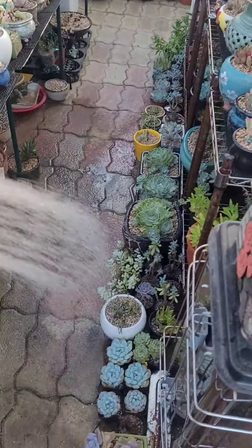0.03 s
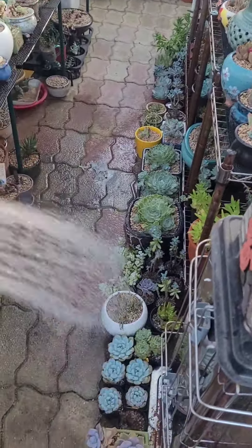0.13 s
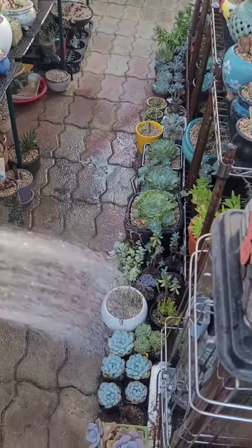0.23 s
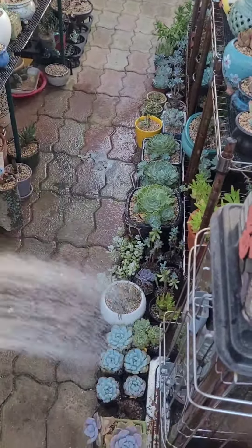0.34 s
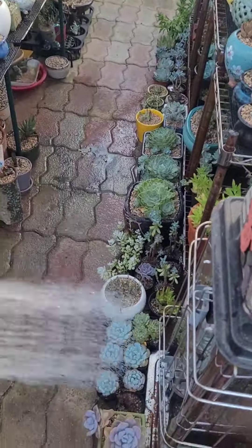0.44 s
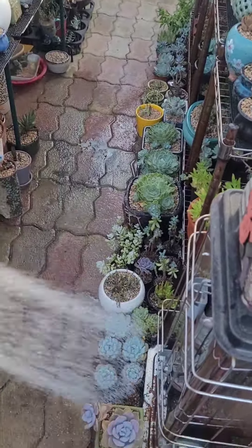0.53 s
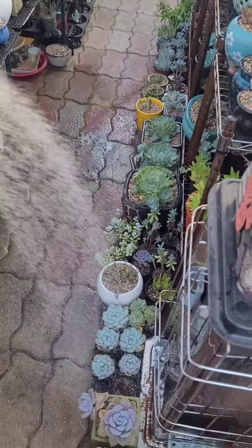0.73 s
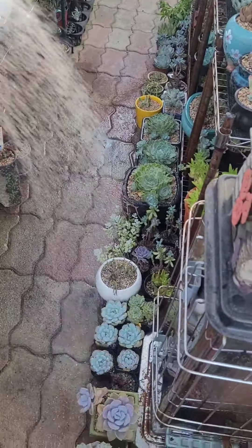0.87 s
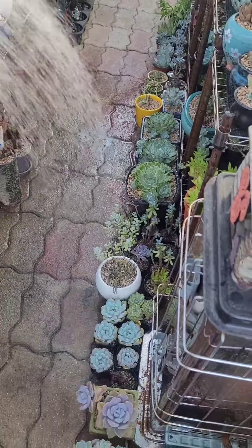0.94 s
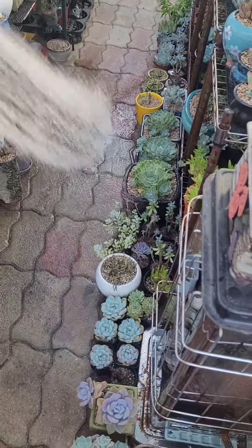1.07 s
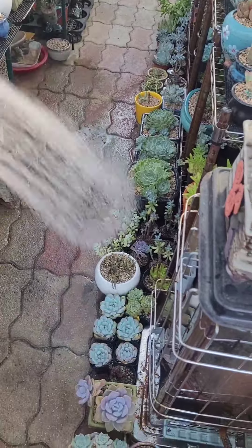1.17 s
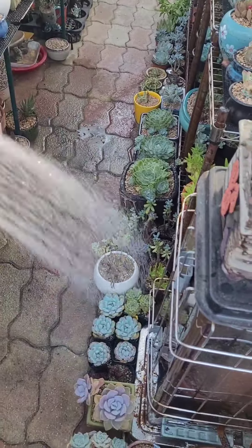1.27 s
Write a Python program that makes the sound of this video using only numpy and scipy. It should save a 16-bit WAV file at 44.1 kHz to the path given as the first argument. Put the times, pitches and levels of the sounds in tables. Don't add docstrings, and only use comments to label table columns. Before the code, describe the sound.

A hose nozzle sprays fine water in a continuous bright hiss, drops pattering on leaves and pots at first, then one deep soft thump from a hand on the microphone; close outdoor paved yard, hiss on the left.

```python
import sys
import numpy as np
from scipy import signal
from scipy.fft import rfft, irfft
from scipy.io import wavfile
from scipy.ndimage import uniform_filter1d

SR = 44100
rng = np.random.default_rng(int(sys.argv[2]) if len(sys.argv) > 2 else 0)


def nominal_scale(level):
    x = np.asarray(level, float) / 20
    return 10 ** x


def digitize_waveform(pressure):
    field = np.atleast_2d(pressure).T
    bounded = np.clip(field, -1, 1)
    quanta = np.round(bounded * 32767).astype(np.int16)
    wavfile.write(sys.argv[1], SR, quanta)


N = 57330
T = np.arange(N) / SR
BIN_HZ = np.arange(N // 2 + 1) * SR / N

# (time [s], level [dB])
JET_LEVEL = [(0.0, -37), (0.05, -38.5), (0.242, -38), (0.38, -41), (0.398, -38.5), (0.672, -40),
             (0.782, -42), (1.296, -41), (1.3, -43)]
# (frequency [Hz], density [dB per Hz])
JET_SPECTRUM = [(500, -33.5), (1000, -27.5), (2000, -12), (3000, -5), (8000, -7.5), (8350, -3.5),
                (12000, -1.5), (15800, -3)]
# (time [s], pose [0 near pots, 1 turning, 2 far pots])
SWING_POSE = [(0, 0.21), (.2, 0.41), (.34, 0.98), (.66, 1.04), (.76, 1.82), (1., 2.6), (1.3, 1.56)]
# (centre [Hz], width [Hz], gain near [dB], gain turning [dB], gain far [dB])
HAND_RESONANCES = [(1330, 430, 3, 1.5, -2.5), (2620, 210, -5, -0.3, 1), (3185, 325, 1.5, 4.5, 0.5),
                   (4070, 160, 4, -10, 4), (4930, 450, 2, -1.5, 0.5), (5860, 275, 2, 4, 3),
                   (7160, 330, -11, -8, 3.7), (6620, 150, 2.5, 0.7, -6), (8750, 440, -3, 4.5, 3),
                   (10170, 1090, 7, 2.3, 9.5), (11700, 350, 0.2, 0, -1.5), (13040, 360, -7, -4.5, 4),
                   (13700, 350, 4.5, 3, 6), (14800, 210, -10, -7, 7)]
# (time [s], level [dB])
LANDING_LEVEL = [(0, -55), (.07, -54.5), (.135, -56.5), (.17, -65.5), (.2, -64), (.215, -56), (.25, -63.5),
                 (.4, -74), (.5, -72), (.56, -70), (.95, -69.5), (1.02, -68), (1.08, -71), (1.3, -90)]
# (frequency [Hz], density [dB per Hz])
YARD_SPECTRUM = [(25, -32), (55, -6), (100, 1), (160, -11.5), (300, -2.5), (500, -10.5), (900, -26),
                 (2000, -42)]
# (time [s], level [dB])
GRIP_LEVEL = [(0, -31.5), (.08, -33.5), (.2, -32), (.3, -32), (.39, -30.5), (.5, -37.5), (.535, -42),
              (.57, -33), (.64, -31.5), (.69, -35.5), (.72, -42.5), (.76, -38.5), (1., -37.5), (1.1, -41),
              (1.155, -30), (1.195, -42.5), (1.23, -35), (1.3, -43)]
# (frequency [Hz], density [dB per Hz])
TREMOR_SPECTRUM = [(18, -41), (35, 1.5), (52, 5), (68, -0.5), (100, -17.5), (160, -29), (300, -47),
                   (600, -66)]
# (frequency [Hz], density [dB per Hz])
SELF_SPECTRUM = [(300, 18.5), (1000, -1), (3000, -1), (8000, -13), (11000, -9), (16000, -26)]
# (time [s], peak [dB], polarity [+1 or -1])
FINGER_SLIPS = [
    (0.057, -38, 1),
    (0.11, -63, 1),
    (0.197, -32.5, 1),
    (.234, -33, -1),
    (0.258, -32.5, 1),
    (.289, -34, -1),
    (0.408, -44, 1),
    (0.569, -45, 1),
    (0.701, -50, 1),
]
# (time [s], peak [dB], pitch [Hz], share of dull knock [ratio])
FAT_DROPS = [(0.091, -42, 1820, 0.39), (.125, -46, 1485, 0.32), (.2085, -32, 1950, 0.4),
             (.232, -47.5, 1460, 0.55), (.419, -42, 2310, 0.15), (0.456, -41, 2520, 0.23),
             (0.504, -43, 1700, 0.17), (0.618, -39, 2280, 0.049), (1.025, -52.5, 1010, 0.13),
             (1.038, -45, 2220, .3), (1.13, -32, 2580, 0.069), (1.156, -42, 2200, 0.077),
             (1.178, -41, 2280, 0.086), (1.246, -46.5, 1620, 0.081), (1.29, -48, 2070, 0.16)]


def rms_one(x):
    return x / np.sqrt(np.mean(x ** 2) + 1e-20)


def line(rows, at):
    x, y = np.transpose(np.array(rows, float))
    return np.interp(at, x, y)


def coloured(spectrum):
    hz = BIN_HZ + 1
    at, db = np.transpose(spectrum)
    inside = (hz > at[0] / 2) & (hz < at[-1] * 2)
    gain = nominal_scale(np.interp(np.log(hz), np.log(at), db))
    return rms_one(irfft(rfft(rng.standard_normal(N)) * inside * gain, N))


def band(hz, width_hz):
    envelope = np.exp(-((BIN_HZ - hz) / width_hz) ** 2)
    return rms_one(irfft(rfft(rng.standard_normal(N)) * envelope, N))


def ring(clicks, hz, t60):
    radius = nominal_scale(-60 / (t60 * SR))
    angle = 2 * np.pi * hz / SR
    feedback = [1, -2 * radius * np.cos(angle), radius * radius]
    return signal.lfilter([0, np.sin(angle)], feedback, clicks + 1e-18)


def grains(per_s, spread_db):
    sizes = nominal_scale(spread_db * np.minimum(rng.exponential(1, N), 5)) * rng.choice([-1, 1], N)
    return sizes * (rng.random(N) < per_s / SR)


def blur(x, width, axis):
    size = max(int(width), 1)
    once = uniform_filter1d(x, size, axis=axis)
    return uniform_filter1d(once, size, axis=axis)


def jet():
    grain_share = 0.25
    bursts = rms_one(grains(per_s=9000, spread_db=2.5))
    raw = np.sqrt(grain_share) * bursts + np.sqrt(1 - grain_share) * rng.standard_normal(N)
    hz, s, z = signal.stft(raw, SR, nperseg=512, noverlap=384)
    at, db = np.transpose(JET_SPECTRUM)
    mean_db = np.interp(np.log(hz + 1), np.log(at), db, left=-60)
    gain_db = mean_db[:, None] + 0 * s
    swing = line(SWING_POSE, s)
    for centre, width, *pose_db in HAND_RESONANCES:
        peak = np.exp(-((hz[:, None] - centre) / width) ** 2)
        gain_db += peak * np.interp(swing, [0, 1, 2], pose_db)
    patch_hz, patch_s, patch_db, flutter_db = 180, 0.07, 2.2, 0.8
    patches = blur(rng.standard_normal(z.shape), patch_hz / hz[1], axis=0)
    patches = blur(patches, patch_s / s[1], axis=1)
    flutter = blur(rng.standard_normal(len(s)), 2.3, axis=0)
    gain_db += patch_db * rms_one(patches) + flutter_db * rms_one(flutter)
    hiss = signal.istft(z * nominal_scale(gain_db), SR, nperseg=512, noverlap=384)[1][:N]
    return 2 * nominal_scale(line(JET_LEVEL, T)) * rms_one(hiss)


def patter():
    cycles = 4.1
    clicks = grains(per_s=2700, spread_db=3.5)
    dealt = rng.integers(0, 16, N)
    out = np.zeros(N)
    for k, hz in enumerate(np.geomspace(810, 2500, num=16)):
        out += ring(clicks * (dealt == k), hz, t60=cycles / hz * 2)
    ticks = np.diff(out, prepend=0)
    return 2 * nominal_scale(line(LANDING_LEVEL, T)) * rms_one(ticks)


def yard():
    start_db, fade_db_per_s = -70, -3
    return nominal_scale(start_db + fade_db_per_s * T) * coloured(YARD_SPECTRUM)


def tremor():
    even_s, evenness = 0.03, 0.75
    rumble = coloured(TREMOR_SPECTRUM)
    swell = np.sqrt(blur(rumble ** 2, even_s * SR, axis=0) + 0.02)
    return nominal_scale(line(GRIP_LEVEL, T)) * rms_one(rumble / swell ** evenness)


def leak():
    level_db, fade_db, fade_s, fade_span_s = -68, -7, 0.87, 0.058
    away = 0.5 + 0.5 * np.tanh((T - fade_s) / fade_span_s)
    return nominal_scale(level_db + fade_db * away) * band(hz=13200, width_hz=1300)


def self_noise():
    return nominal_scale(-76.5) * coloured(SELF_SPECTRUM)


def slips():
    clicks = np.zeros(N)
    for s, db, polarity in FINGER_SLIPS:
        clicks[int(s * SR)] = polarity * nominal_scale(db)
    knocks = ring(clicks, hz=228, t60=0.017)
    return blur(knocks, 0.0011 * SR, axis=0)


def band_passed(burst, hz, width):
    edges = [hz * (1 - width / 2), hz * (1 + width / 2)]
    out = signal.sosfilt(signal.butter(2, edges, "band", fs=SR, output="sos"), burst)
    return out / np.abs(out).max()


def drops():
    splash_s, width, knock_ratio, tick_gain = 0.004, 0.3, 0.45, 12.0
    out = np.zeros(N)
    t = np.arange(2048) / SR
    for s, db, hz, knock in FAT_DROPS:
        burst = rng.standard_normal(len(t)) * np.exp(-t / splash_s) + tick_gain * (t == 0)
        high = band_passed(burst, hz, width)
        low = band_passed(burst, hz * knock_ratio, 2 * width)
        i = int(s * SR)
        out[i:i + len(t)] += (nominal_scale(db) * (high + knock * low))[:N - i]
    return out


def pot():
    level_db, centre_s, span_s = -64.5, 0.49, 0.23
    swell = np.exp(-((T - centre_s) / span_s) ** 2)
    return nominal_scale(level_db) * swell * band(hz=363, width_hz=120)


def thump():
    start_s, rise_s, hold_s, stop_power = 0.3245, 0.0037, 0.033, 3.2
    rest_hz, glide_hz, glide_s = 59.5, 112, 0.0034
    t = np.maximum(T - start_s, 0)
    rise = np.sin(np.pi / 2 * np.minimum(t / rise_s, 1)) ** 2
    turns = rest_hz * t + glide_hz * glide_s * (1 - np.exp(-t / glide_s))
    shape = rise * np.exp(-(t / hold_s) ** stop_power)
    push = -nominal_scale(-7) * shape * np.sin(2 * np.pi * turns)
    case_db, case_hz, case_t60_s = -18, 147.4, 0.08
    case = nominal_scale(case_db - 60 * t / case_t60_s) * rise * np.sin(2 * np.pi * case_hz * t)
    air = nominal_scale(-56) * coloured(SELF_SPECTRUM) * np.exp(-t / 0.012) * rise
    rattle = nominal_scale(-43.5) * band(hz=330, width_hz=236) * np.exp(-t / 0.013) * rise
    return push + case + air + rattle


def scene():
    left = jet() + patter() + yard() + drops() + pot()
    right = tremor() + leak() + self_noise() + slips() + thump()
    return np.array([left, right])


def roll_off(x):
    return signal.sosfilt(signal.butter(12, 17010, fs=SR, output="sos"), x)


def record(dry):
    cutoff_hz = 15760
    mix = irfft(rfft(dry) * (BIN_HZ < cutoff_hz), N)
    return roll_off(mix)


dry = scene()
out = record(dry)
digitize_waveform(out)
```